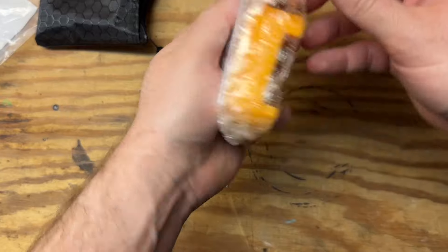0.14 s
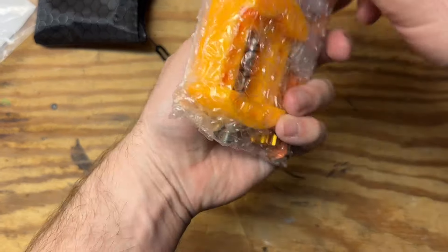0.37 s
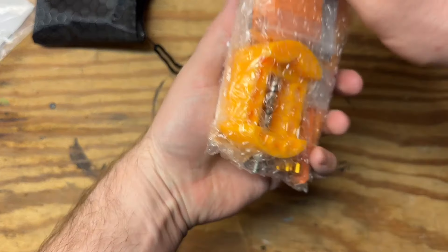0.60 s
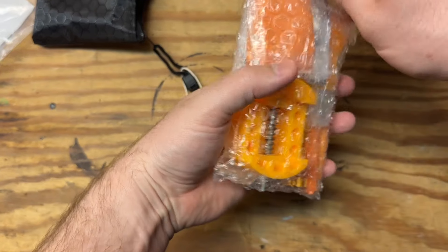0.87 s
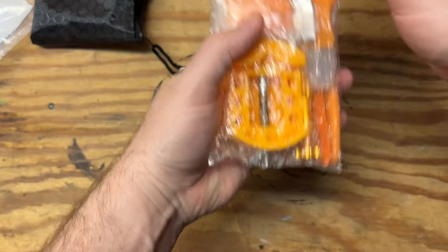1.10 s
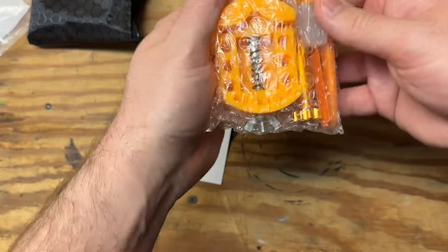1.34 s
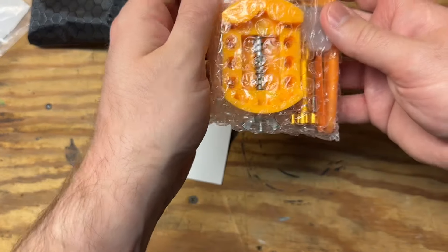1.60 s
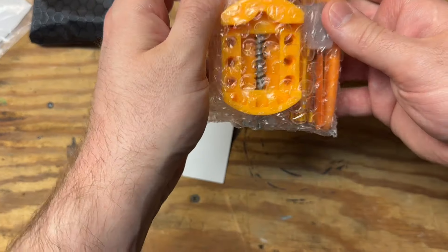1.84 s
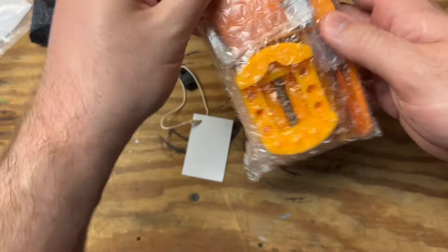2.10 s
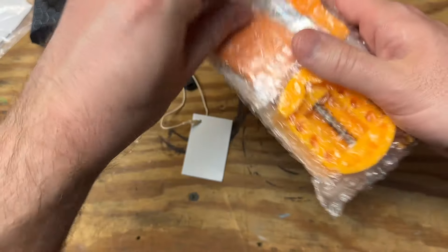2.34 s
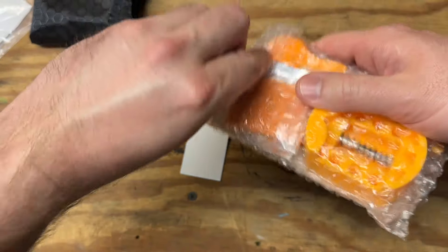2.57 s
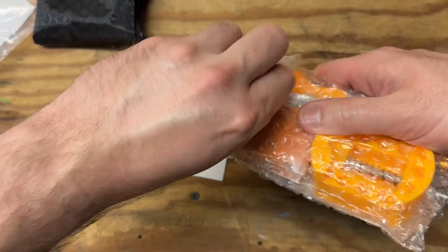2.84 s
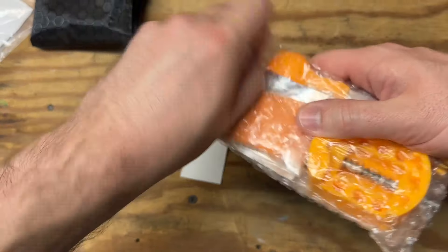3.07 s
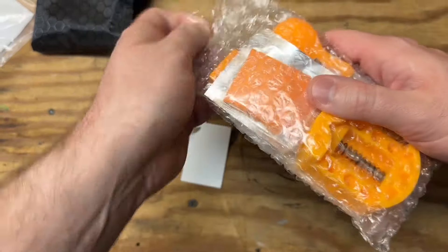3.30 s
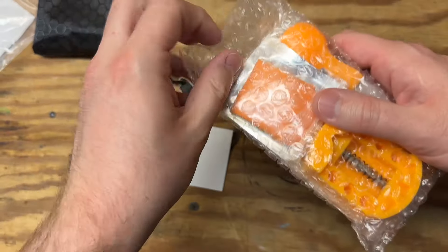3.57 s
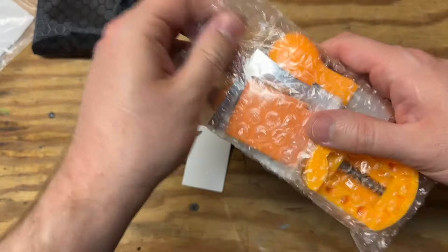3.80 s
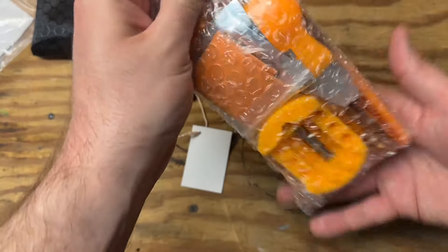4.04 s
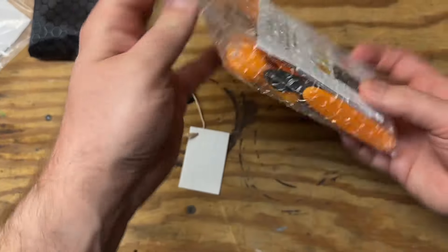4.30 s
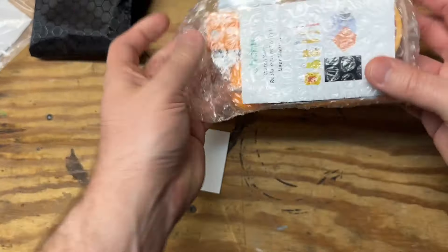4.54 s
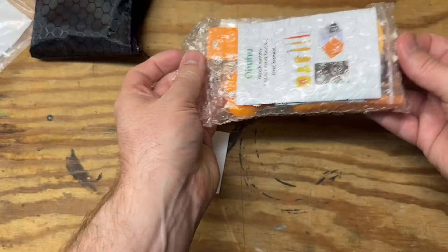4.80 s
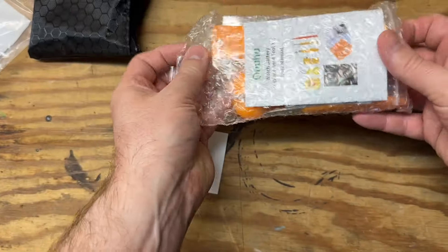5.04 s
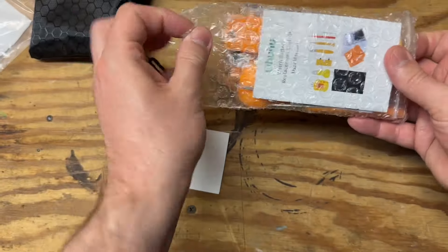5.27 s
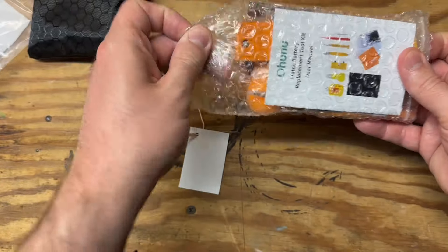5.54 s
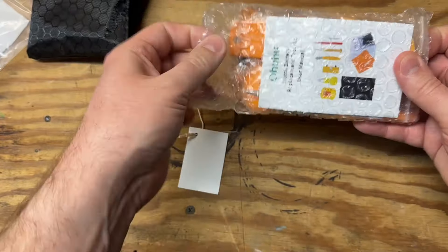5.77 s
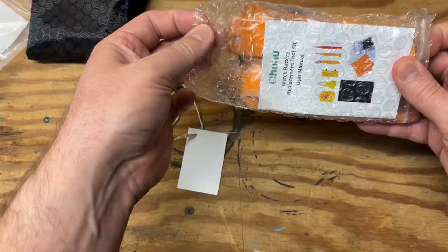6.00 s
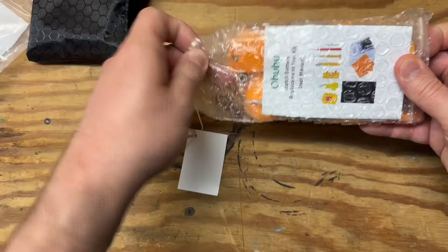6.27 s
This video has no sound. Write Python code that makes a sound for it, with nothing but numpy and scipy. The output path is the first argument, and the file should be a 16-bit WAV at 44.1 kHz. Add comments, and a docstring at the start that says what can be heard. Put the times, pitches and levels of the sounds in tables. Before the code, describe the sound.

Crisp plastic film rustles over a workbench, with lower, papery crunch from squeezed air pockets. Scattered ticks and clicks give way to a brief near-pause, then louder crackling and a burst of sharp pops. Further bursts and single strong snaps follow until the crackle cuts off mid-handling. Packed parts knock dully now and then. The pickup is close, with very short reflections and a quiet, deep motor drone.

```python
"""Fine crackle starts at once, over the steady hum of a motor somewhere in a small workshop.
Two hands turn, squeeze and peel a parcel of bubble wrap over a workbench, close under a phone.
The crackle is thousands of tiny rings over rubbing hiss; single creases in the film snap out of it
as a click, a noise burst, a short falling ring and a thud. Packed parts shift with dull bumps.
The hum is a few sine waves over low air noise; bench reflections smear the sound."""
import sys
import numpy as np
from scipy import signal
from scipy.fft import rfft, irfft, next_fast_len
from scipy.io import wavfile
from scipy.ndimage import uniform_filter1d, map_coordinates

SR = 44100
rng = np.random.default_rng(int(sys.argv[2]) if len(sys.argv) > 2 else 0)


def gain_from_db(level_db):
    """Turn a decibel level (scalar or array-like) into a linear amplitude factor."""
    decades = np.asarray(level_db, float) / 20
    return 10 ** decades


def output_pcm(signal):
    """Save a mono or channel-first signal as 16-bit PCM at the path in sys.argv[1].

    Samples are clipped to [-1, 1] before scaling.
    """
    pcm = np.clip(np.atleast_2d(signal).T, -1, 1) * 32767
    wavfile.write(sys.argv[1], SR, np.round(pcm).astype(np.int16))


N = 281718  # length of the scene [samples]


def unit(x):
    """Scales x to rms 1."""
    return x / np.sqrt(np.mean(x ** 2) + 1e-20)


def along(points, hz):
    """Reads a curve of (frequency [Hz], value) points on a log frequency axis."""
    f, v = np.transpose(points)
    return np.interp(np.log(hz + 1), np.log(f + 1), v)


def over_time(points):
    """Reads a curve of (time [s], value) points at every sample."""
    return np.interp(np.arange(N) / SR, *np.transpose(points))


def wobble(rate):
    """Draws a smooth random curve with rate knots a second."""
    knots = rng.standard_normal(int(N * rate / SR) + 4)
    return map_coordinates(knots, [np.arange(N) * rate / SR])


def filtered(x, response):
    """Multiplies the spectrum of x by a (complex) response of frequency."""
    m = next_fast_len(N + 8192)
    return irfft(rfft(x, m) * response(np.fft.rfftfreq(m, 1 / SR)), m)[..., :N]


def coloured_noise(spectrum):
    """Noise whose spectrum follows (frequency [Hz], level [dB]) points."""
    return filtered(rng.standard_normal(N), lambda f: gain_from_db(along(spectrum, f)))


def laid(s, shapes):
    """Sums the rows of shapes into one track, each from its start time s."""
    at = np.round(np.maximum(s, 0) * SR).astype(int)[:, None] + np.arange(shapes.shape[1])
    return np.bincount(at.ravel(), shapes.ravel(), N + shapes.shape[1])[:N]


def rings(s, hz, gain, cycles, size, glide=0):
    """Short sines that swell to a peak at s in some cycles and die away; glide: share they start higher."""
    turns = hz[:, None] * np.arange(size) / SR
    start = s - cycles / hz
    cycles, glide = np.reshape(cycles, (-1, 1)), np.reshape(glide, (-1, 1))
    swell = turns / cycles * np.exp(1 - turns / cycles)
    extra_turns = glide * cycles * (1 - np.exp(-turns / cycles))
    return laid(start, gain[:, None] * swell * np.sin(2 * np.pi * (turns + extra_turns)))


def bursts(s, db, colour, rise, trail, trail_s, size=800, click=0):
    """Coloured noise bursts that peak near s and trail off; click is the share of energy in a clean click."""
    t, f = np.arange(size) / SR, np.fft.rfftfreq(size, 1 / SR)
    fade = t / rise * np.exp(1 - t / rise)
    fade = fade + trail * (1 - np.exp(-t / rise)) * np.exp(-t / trail_s)
    noise = irfft(rfft(rng.standard_normal((len(s), size))) * colour(f), size)
    u = rng.random((len(s), 2))
    # the click's lows arrive late, as bending waves do: 1 kHz lags the treble by 0.5 ms on average
    late_at_1k_s = 0.0005 * 2 * u[:, :1]
    late_turns = 2 * late_at_1k_s * np.sqrt(1000 * f)
    flip = irfft(colour(f) * np.exp(-2j * np.pi * (f * rise / 2 + late_turns + u[:, 1:])), size)
    rows = lambda x: x / np.linalg.norm(x, axis=1, keepdims=True)
    shapes = np.sqrt(1 - click) * rows(fade * noise) + np.sqrt(click) * rows(flip)
    strength = np.linalg.norm(fade) * noise.std(axis=1, keepdims=True)
    return laid(s - rise, gain_from_db(db)[:, None] * strength * shapes)


# how hard the hands work, given as the level of the film's crackle: (time [s], level [dB])
HANDS_EFFORT = [(0.0, -42), (0.04, -40), (0.2, -50), (0.27, -48), (0.3, -41), (0.6, -46), (0.89, -42),
                (0.95, -48), (1.0, -40.5), (1.1, -44), (1.42, -43), (1.55, -46), (1.6, -53), (1.68, -61),
                (1.74, -66), (1.81, -55), (1.91, -51), (1.95, -39), (2.24, -38.5), (2.42, -44.5),
                (2.67, -49.5), (2.77, -39), (2.845, -47), (2.89, -36), (2.97, -38), (3.01, -43),
                (3.15, -37), (3.3, -44), (3.34, -41), (3.45, -43), (3.48, -48), (3.55, -50), (3.62, -46),
                (3.66, -49), (3.7, -44), (3.76, -44), (3.81, -36), (3.9, -39), (4.025, -43), (4.065, -36),
                (4.1, -39.5), (4.135, -35.5), (4.19, -35), (4.22, -39), (4.28, -38), (4.33, -40.5),
                (4.9, -44), (5.14, -42), (5.21, -38), (5.24, -46), (5.32, -45.5), (5.38, -40), (5.47, -42),
                (5.54, -35.5), (5.65, -40), (5.8, -38), (5.86, -42), (6.0, -38), (6.04, -43), (6.22, -35),
                (6.3, -41), (6.39, -41.5)]


def effort(s):
    """Effort of the hands in dB at the times s."""
    return np.interp(s, *np.transpose(HANDS_EFFORT))


def crackle(spectrum, level_db, clumps, centre_hz, octaves, cycles, spread_db, hiss, thinning, count, size):
    """Tiny bucklings of random pitch and size over rubbing hiss; gentle handling gives fewer of them."""
    u, z = rng.random((count, 2)), rng.standard_normal(count)
    busy = gain_from_db(thinning * (level_db - level_db.max()))
    crowd = np.cumsum(clumps * busy)
    s = np.interp(u[:, 0] * crowd[-1], crowd, np.arange(N) / SR)
    hz = np.clip(centre_hz * 2 ** (octaves * z), 80, 16500)
    size_db = np.minimum(-spread_db * np.log(1 - u[:, 1]), 2.32 * spread_db)
    grains = rings(s, hz, gain_from_db(size_db) * np.sqrt(hz / centre_hz), cycles, size)
    # grains are whitened first, so that the spectrum alone sets the colour
    power = uniform_filter1d(np.abs(rfft(grains, next_fast_len(N + 8192))) ** 2, size=2001)
    whitening = np.sqrt(np.abs(power) + 1e-7 * power.max())
    grains = filtered(grains, lambda f: gain_from_db(along(spectrum, f)) / whitening)
    rub = unit(coloured_noise(spectrum)) * unit(np.sqrt(clumps))
    return gain_from_db(level_db) * unit(unit(grains / np.sqrt(busy)) + hiss * rub)


# colour of the film's crackle: (frequency [Hz], relative level [dB per Hz])
FILM_COLOUR = [(700, -17), (1400, -12), (2700, -4), (4100, -3), (5000, -6), (7100, -1), (9900, 2),
               (12500, -9), (15600, -5.5)]
# colour of the squeezed air pockets: (frequency [Hz], relative level [dB per Hz])
POCKET_COLOUR = [(60, -28), (150, -4.5), (360, -5), (800, -2), (1400, -2.5), (2500, -6.5), (5000, -64)]
# how much the grip's pressure lifts the pockets: (time [s], level [dB])
GRIP_PRESSURE = [(0.0, 2), (0.4, -3), (0.7, 1.5), (1.1, -1), (2.0, -4), (2.8, -1), (3.2, 2.5), (4.3, 0),
                 (5.401, 2), (6.39, 0)]


def rustle():
    """The film crackles high, the squeezed pockets lower; both bunch with the same finger twitches."""
    film_db = effort(np.arange(N) / SR)
    # pockets: -52.5 dB at mean effort and 0 dB grip, growing 1.1 dB per dB of effort
    pocket_db = -52.5 + 1.1 * (film_db - film_db.mean()) + over_time(GRIP_PRESSURE)
    twitch_db = 1.2 * wobble(30) + 3.2 * wobble(130) + 1.0 * wobble(9)
    pocket_twitch_db = twitch_db + 2.5 * wobble(40)
    film = crackle(FILM_COLOUR, film_db, gain_from_db(twitch_db), centre_hz=6260, octaves=0.8, cycles=0.75,
                   spread_db=4.5, hiss=0.3, thinning=1.1, count=26000, size=64)
    pockets = crackle(POCKET_COLOUR, pocket_db, gain_from_db(pocket_twitch_db), centre_hz=1016, octaves=0.9,
                      cycles=0.73, spread_db=2.5, hiss=0.3, thinning=0.7, count=9000, size=300)
    return film + pockets


# lines of the motor's hum: (frequency [Hz], mean rms level [dB])
MOTOR_HUM = [(56.67, -46.5), (103.5, -66.5), (240, -79)]
# colour of the air noise: (frequency [Hz], relative level [dB per Hz])
AIR_COLOUR = [(25, -35), (45, -6), (70, -5.5), (120, -6), (170, -25), (1200, -32.5), (8000, -31),
              (15800, -24)]


def room_tone():
    """Steady motor lines, sines of slightly unsteady level, over air noise that is mostly low."""
    t = np.arange(N) / SR
    hum = np.zeros(N)
    for hz, db in MOTOR_HUM:
        hum += gain_from_db(db + 0.44 * wobble(6)) * np.sqrt(2) * np.sin(2 * np.pi * hz * t + 2.18)
    air = gain_from_db(-59.0) * unit(coloured_noise(AIR_COLOUR))
    return hum + air


def random_snaps(count):
    """Further creases at random moments, following the handling around them; rows like CREASE_SNAPS."""
    u, z = rng.random((count, 2)), rng.standard_normal((count, 2))
    s = u[:, 0] * N / SR
    sizzle_db = effort(s) + 4.5 + 2 * z[:, 0]
    body_db = sizzle_db - 16 + 4 * z[:, 1]
    hz = 900 * 2 ** (1.96 * u[:, 1])
    return np.transpose([s, sizzle_db, body_db, hz])


# single creases placed by hand, from faint ticks to loud snaps; both levels are relative, as each
# part of a snap adds its own offset:
# (time [s], film sizzle level [dB], body level [dB], pitch of the fold [Hz])
CREASE_SNAPS = [(0.2891, -29, -51, 4500), (0.5, -54, -45, 1250), (0.6545, -33, -42, 2500),
                (0.68, -42, -38.5, 1780), (0.7446, -36, -44, 1400), (0.776, -21.5, -52, 4500),
                (0.9045, -33, -38, 2520), (0.9214, -25, -32.5, 1410), (0.984, -35, -40, 970),
                (0.997, -28, -44, 2000), (1.0055, -29, -35.5, 1400), (1.0214, -55, -33, 1040),
                (1.0454, -44, -42, 1390), (1.188, -40, -43, 4300), (1.202, -32, -52, 4500),
                (1.2088, -27, -39.5, 4520), (1.3641, -30, -41, 1180), (1.4055, -36, -41, 2980),
                (1.5634, -33, -37, 4570), (1.608, -40, -58, 4500), (1.6562, -56, -43, 2080),
                (1.663, -40.5, -49, 3500), (1.724, -48, -59, 3930), (1.7555, -65, -71, 2600),
                (1.7642, -62, -36.5, 2500), (1.7652, -62, -43, 850), (1.8022, -40, -54, 4030),
                (1.8413, -31.5, -54, 3900), (1.9508, -28.5, -48, 4600), (2.0095, -29, -54, 4500),
                (2.04, -35, -49, 4500), (2.0671, -26, -39, 3900), (2.0755, -30, -50, 5000),
                (2.088, -29, -50, 5000), (2.3068, -41, -39.5, 785), (2.336, -44, -40.5, 1200),
                (2.362, -47, -45, 1860), (2.385, -49, -42.5, 1150), (2.413, -27, -36, 4520),
                (2.429, -29, -40, 4370), (2.529, -34, -47, 3500), (2.56, -40, -44.5, 2470),
                (2.5954, -30, -42, 2150), (2.62, -43, -39.5, 1550), (2.647, -40, -42.5, 1410),
                (2.7115, -43, -47, 3500), (2.718, -44, -39, 910), (2.7363, -26.5, -42.5, 2280),
                (2.786, -35, -28, 1220), (2.7899, -23, -46, 3440), (2.7951, -25.5, -35, 5170),
                (2.808, -31, -32, 1350), (2.8105, -24, -39, 4550), (2.825, -31, -32.5, 905),
                (2.8472, -31, -56, 5000), (2.858, -25, -44, 5000), (2.8617, -8.5, -25, 1050),
                (2.8695, -27, -30, 2340), (2.8868, -12, -36, 3150), (2.8885, -19, -44, 4000),
                (2.8922, -30, -33, 1470), (2.8942, -15.5, -25, 3270), (2.909, -35, -40, 2850),
                (2.9106, -16, -31, 4690), (2.9122, -36, -34, 4950), (2.9306, -23, -33, 2430),
                (2.9476, -26, -43, 4000), (2.9498, -40, -29, 1920), (2.957, -35, -48, 5000),
                (2.9623, -18, -27, 3270), (2.9642, -24, -37, 3320), (2.9707, -14, -25, 1820),
                (2.9728, -24, -21.5, 710), (3.0373, -23, -34, 1620), (3.071, -40, -36, 2200),
                (3.124, -48, -35.5, 1210), (3.1444, -35, -34, 1470), (3.172, -36, -33, 795),
                (3.1765, -22, -36, 1740), (3.2349, -29, -39, 2420), (3.238, -38, -32, 2500),
                (3.3284, -28, -34, 1630), (3.3394, -36, -26.5, 1810), (3.3918, -42, -36, 755),
                (3.4038, -29, -35.5, 3130), (3.448, -29, -54, 3500), (3.507, -48, -43, 1400),
                (3.595, -36, -47, 3460), (3.636, -33, -46, 3480), (3.6712, -30, -48, 4500),
                (3.743, -29, -46, 3500), (3.7774, -26, -39, 1700), (3.7975, -22, -41, 3000),
                (3.8041, -30, -32, 855), (3.8398, -19.5, -26, 1900), (3.9293, -25, -39, 1300),
                (3.9602, -23, -39, 2000), (3.9767, -26, -39.5, 1100), (4.0024, -24, -39.5, 2140),
                (4.007, -29, -35.5, 610), (4.0568, -26, -38, 3570), (4.0668, -36, -29.5, 1070),
                (4.075, -28, -36, 2200), (4.113, -35, -39, 3020), (4.132, -30, -32, 2070),
                (4.1886, -29, -35.5, 2600), (4.2346, -26, -38, 2020), (4.2715, -25, -40, 3500),
                (4.2912, -30, -56, 1430), (4.341, -32, -42.5, 600), (4.45, -42, -35, 2100),
                (4.5085, -31, -52, 4330), (4.6023, -33, -34, 1550), (4.732, -28.5, -43, 1680),
                (4.7457, -36, -33.5, 910), (4.8855, -34, -49, 3500), (5.0029, -29, -53, 5000),
                (5.021, -31, -58, 3500), (5.1962, -20, -17, 1140), (5.2029, -26, -42, 2490),
                (5.2216, -30, -51, 5000), (5.264, -48, -43, 2200), (5.293, -42, -43, 3700),
                (5.3344, -27, -39, 2700), (5.3695, -41, -35, 900), (5.3765, -35, -38, 900),
                (5.388, -42, -34, 780), (5.3945, -40, -40, 1300), (5.487, -39, -45, 4500),
                (5.5155, -19, -23.5, 5230), (5.516, -23, -29.5, 1240), (5.5244, -39, -27.5, 4200),
                (5.552, -43, -35, 1500), (5.575, -29, -40, 3520), (5.597, -35, -44, 1820),
                (5.667, -33, -41, 597), (5.803, -40, -32.5, 870), (5.8115, -36, -34, 2230),
                (5.815, -26, -29.5, 1130), (5.8273, -25, -29, 5430), (5.858, -42, -42, 2260),
                (5.9036, -25, -39.5, 1420), (5.9475, -29, -48, 3500), (5.9744, -25, -50, 1010),
                (5.99, -35, -45, 3030), (6.006, -43, -41, 1190), (6.104, -42, -48, 895),
                (6.133, -38, -50, 3500), (6.174, -29, -37.5, 800), (6.1932, -21, -46, 4690),
                (6.21, -41, -36, 2200), (6.23, -29, -47, 5000), (6.2335, -16.5, -35, 5000),
                (6.2443, -19, -22.5, 1320), (6.2518, -19, -23.5, 1440), (6.261, -46.5, -37, 1820),
                (6.282, -27.5, -30, 1320), (6.302, -27, -34.5, 3460), (6.33, -34, -55, 3500),
                (6.379, -32, -27, 1390)]
# colour of the flipping film: (frequency [Hz], relative level [dB per Hz])
SIZZLE_COLOUR = [(2500, -26.5), (4200, -10.5), (5600, -6), (7200, -1), (9500, -3), (12500, -4.5),
                 (15600, -15)]


def snaps():
    """A crease flips: a sizzle, a short falling ring in a broad crack, and a thud of the air pocket."""
    s, sizzle_db, body_db, hz = np.vstack([CREASE_SNAPS, random_snaps(count=320)]).T
    z = rng.standard_normal((len(s), 2))
    pitch = hz / 1400  # relative to a middling fold
    octave = np.log2(pitch)

    # smaller, higher folds push less air: 4 dB less thud per octave
    thud_db = body_db - 5 - 4 * octave
    thud_hz = 520 * 2 ** (0.3 * z[:, 0])
    thud = rings(s + 0.00079, thud_hz, gain_from_db(thud_db), cycles=0.4, size=600, glide=0.52)

    # large, low folds ring less, drop further in pitch and take fewer cycles
    ring_db = body_db + 4 + 0.5 * np.minimum(octave, 0)
    end_hz = 0.8 * np.minimum(pitch, 1.6) ** 0.37 * hz
    ring = rings(s + 0.00024, end_hz, gain_from_db(ring_db), 0.8 * pitch ** 0.7, size=600,
                 glide=1.1 / pitch ** 1.41)

    # the crack is a broad band whose centre follows the fold's pitch part of the way
    centre = 1750 * pitch[:, None] ** 0.55
    width = 1.25 * centre
    sheet = lambda f: (1j * f * width / (centre ** 2 - f ** 2 + 1j * f * width)) ** 2
    crack = bursts(s, body_db + 6, sheet, rise=0.0004, trail=0.48, trail_s=0.0059, click=0.5)

    # each crease is a little brighter or duller
    film = lambda f: gain_from_db(along(SIZZLE_COLOUR, f / 2 ** (0.11 * z[:, 1:])))
    sizzle = bursts(s, sizzle_db + 7.0, film, rise=0.00032, trail=0.16, trail_s=0.0026, click=0.5)
    return thud + ring + crack + sizzle


# parts shifting inside the parcel: (time [s], relative level [dB], pitch [Hz])
PART_BUMPS = [(0.029, -43, 500), (1.003, -43, 277), (1.934, -41, 326), (2.974, -32.5, 335),
              (3.171, -36, 143), (3.809, -37, 282), (4.077, -34.5, 85.5), (4.18, -44, 330),
              (5.837, -41, 234), (6.258, -49, 296)]


def bumps():
    """Packed parts shift: soft low pushes of a cycle or two inside a puff of low noise."""
    s, db, hz = np.transpose(PART_BUMPS)
    pitch = hz[:, None]
    low = lambda f: 1j * f * 1.29 * pitch / ((1.08 * pitch) ** 2 - f ** 2 + 1j * f * 1.72 * pitch)
    puff = bursts(s, db + 13.5, lambda f: low(f) ** 2, rise=0.00416, trail=0.5, trail_s=0.014, size=3000)
    push = rings(s, hz, gain_from_db(db - 0.5), 0.4, size=4000, glide=0.19)
    return push + puff


# how long reflections take to fall by 60 dB, before scaling: (frequency [Hz], time [s])
SHOP_DECAY = [(200, 0.055), (2000, 0.11), (12000, 0.086)]


def scattered(x, t60_scale):
    """Smears x by a decaying noise tail, drawn anew 25 times a second, so that the smear keeps varying."""
    step, out = SR // 25, np.zeros(N + SR)
    for start in range(0, N, step):
        hz, t, z = signal.stft(rng.standard_normal(SR // 10), SR, nperseg=128)
        t60 = t60_scale * along(SHOP_DECAY, hz)[:, None]
        tail = signal.istft(z * gain_from_db(-60 * t / t60), SR, nperseg=128)[1]
        piece = signal.fftconvolve(x[start:start + step], tail / np.linalg.norm(tail))
        out[start:start + len(piece)] += piece
    return out[:N]


# phase by which the right microphone port leads the left: (frequency [Hz], lead [radians])
PORT_LEAD = [(60, 0), (700, .14), (1700, .02), (4000, .1), (4750, .7), (5000, 0), (5300, -.4), (6000, .05),
             (8000, 1.0), (12500, 3.14), (16500, 4.35)]
# part of the sound that differs between the ports: (frequency [Hz], amplitude share [0-1])
PORT_DIFFERENCE = [(60, 0), (130, 0.09), (300, 0.26), (800, 0.29), (1900, 0), (3000, 0.14), (4650, 0.23),
                   (5000, 0.98), (5400, 0), (9000, 0.48), (12500, 0), (15000, 0.52)]


def scene():
    """Parcel, reflections and room tone reach two ports with a phase lag and a part that differs."""
    parcel = rustle() + snaps() + bumps()
    near = parcel + gain_from_db(-8.0) * scattered(parcel, t60_scale=0.88) + room_tone()
    apart = scattered(near, t60_scale=0.34)
    sign = np.array([[-1], [1]])  # left, right
    lag = lambda f: np.exp(1j * sign * along(PORT_LEAD, f) / 2)
    share = lambda f: np.clip(along(PORT_DIFFERENCE, f), 0, 1)
    same = filtered(near, lambda f: lag(f) * np.sqrt(1 - share(f) ** 2))
    return same + filtered(apart, lambda f: lag(f) * sign * share(f))


# the phone's treble edge: (frequency [Hz], level [dB])
TREBLE_EDGE = [(15750, 0), (15950, -12), (16600, -14), (16750, -60)]


def roll_off(x):
    """The treble ends steeply here."""
    return signal.sosfilt(signal.butter(12, 17150, fs=SR, output="sos"), x)


# the phone's treble edge is played here
def record(dry):
    """The phone's treble steps down near 16 kHz."""
    mix = filtered(dry, lambda f: gain_from_db(along(TREBLE_EDGE, f)))
    return roll_off(mix)


dry = scene()
out = record(dry)
output_pcm(out)
```